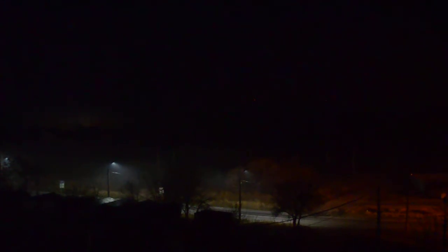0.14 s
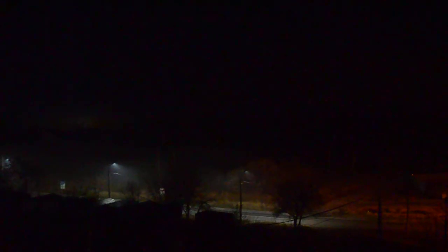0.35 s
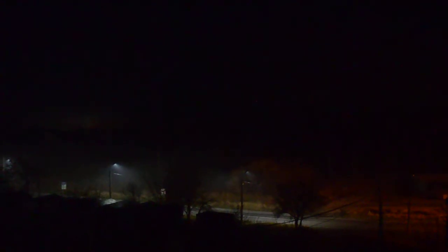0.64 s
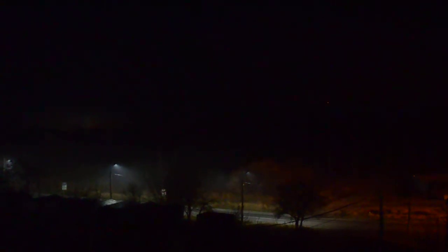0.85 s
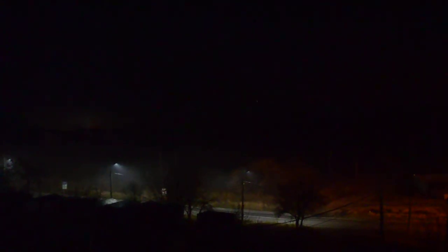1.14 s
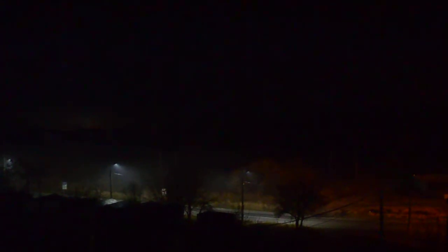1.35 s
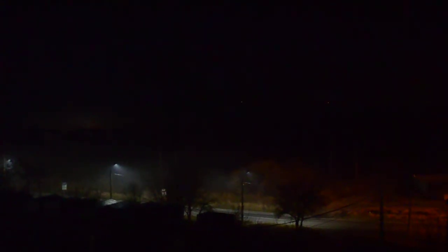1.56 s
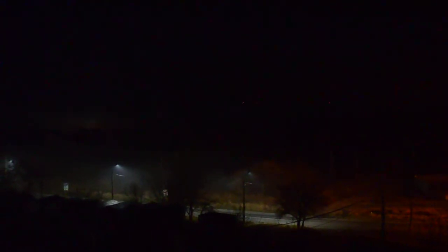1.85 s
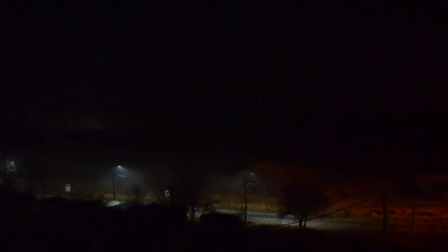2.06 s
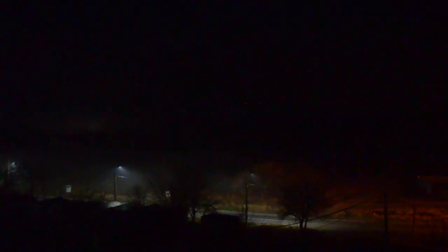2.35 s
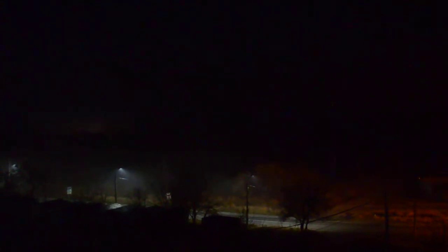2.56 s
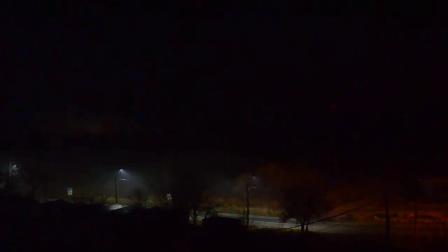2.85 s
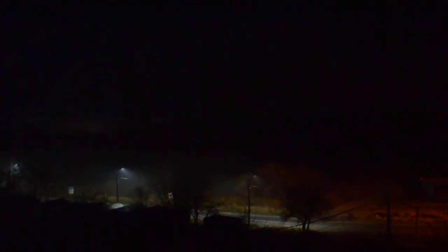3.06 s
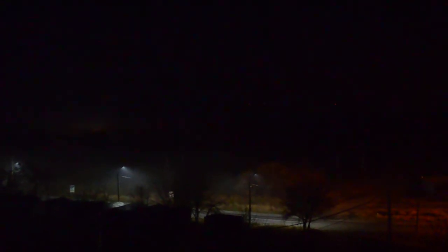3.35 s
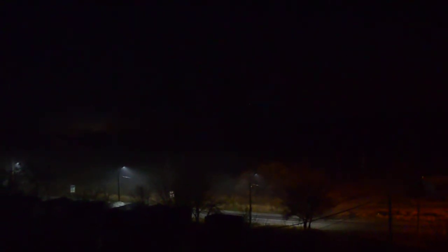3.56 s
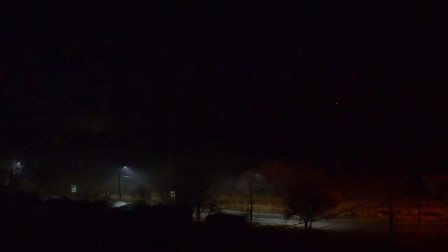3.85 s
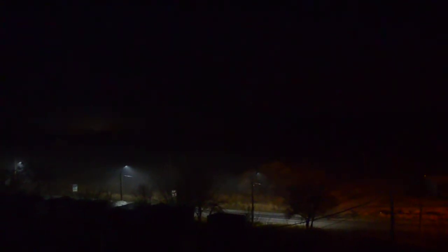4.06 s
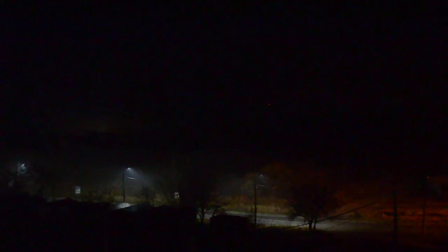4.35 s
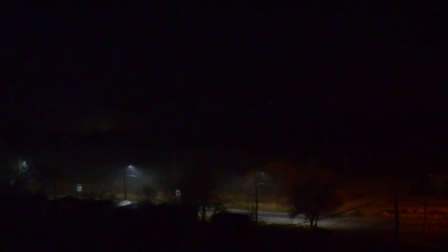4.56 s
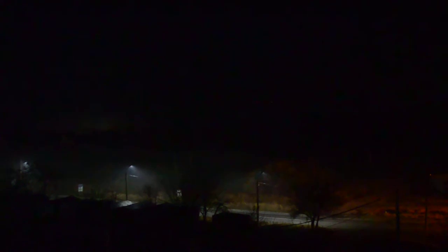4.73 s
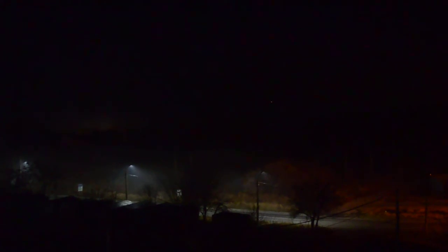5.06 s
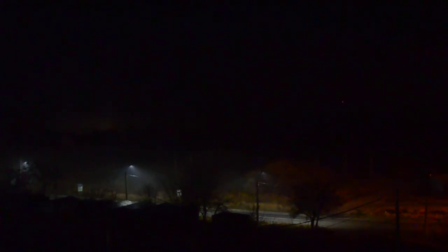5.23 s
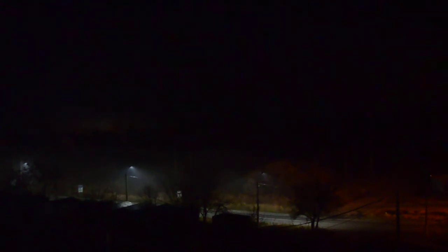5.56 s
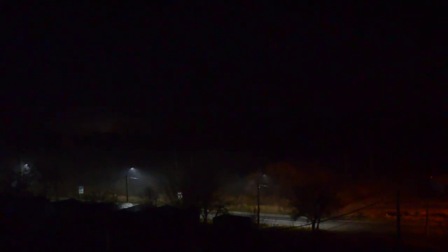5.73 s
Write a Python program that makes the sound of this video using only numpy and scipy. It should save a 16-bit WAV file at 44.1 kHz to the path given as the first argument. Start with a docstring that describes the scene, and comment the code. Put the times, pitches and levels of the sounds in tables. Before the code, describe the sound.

Two pairs of loud, overloading gun blasts crack and boom across a dark town, with rolling echoes sinking into low rumble.

```python
"""Hard gun reports crack and boom across a quiet town at night, heard from a balcony.
About .7 s after each report a second boom comes from farther off. Every blast is a pressure pulse repeated
by nearby walls, then noise shaped into a flurry, street scatter, slaps off far facades and a long roll.
A steady rumble, faint hiss, a soft thud and dull swells of very distant guns are shaped noise too.
Peaks above full scale overload the microphone and clip hard."""
import sys
import numpy as np
from scipy import signal
from scipy.fft import rfft, irfft, next_fast_len
from scipy.io import wavfile
from scipy.ndimage import uniform_filter1d

SR = 44100
rng = np.random.default_rng(int(sys.argv[2]) if len(sys.argv) > 2 else 0)


def dump_mix(stems):
    """Bounce the given channels to the path in sys.argv[1] as a 16-bit WAV at rate SR."""
    frames = np.atleast_2d(stems).T  # one column per channel
    limited = np.clip(frames, -1, 1)  # hard clip at full scale
    pcm = np.round(limited * 32767).astype(np.int16)
    wavfile.write(sys.argv[1], SR, pcm)


N = 260011
TIME = np.arange(N) / SR
GRID_HZ = np.geomspace(10, SR / 2, 900)

FIRST_S, SECOND_S = .6817, 3.0821  # times of the two hard reports in the table below
# hard reports, after an earlier one heard only as a roll under way: (time [s], blast level [dB],
# crack tilt [dB/octave], street scatter level [dB], body frequency [Hz], body level [dB],
# long roll level [dB], roll tilt [dB/octave], bearing [-1 to 1])
REPORTS = [(-0.86, 0, 0, -12, 200, 0, -18.5, -0.1, 0),
           (FIRST_S, 2.86, 0.22, -11, 420, 1.3, -26.5, -1.42, -0.76),
           (SECOND_S, 6.1, 1.34, -12, 320, 1.2, -27, 0.55, 1)]
# booms that follow the reports: same columns
BOOMS = [(-.07, -9, 10, -12.5, 400, 4.6, -31, 0, -1), (1.3593, 1.5, 3, -16, 163.6, 2.44, -32, 0.028, -0.9),
         (3.762, 2, 1.5, -13, 430, 8.2, -30.5, 0.089, 1)]
# spectrum of the booms: (frequency [Hz], relative density [dB per Hz])
BOOM_COLOUR = [(20, -24.5), (50, -3.5), (100, -7), (200, 4), (420, -1.5), (520, -3), (660, -8), (900, -9),
               (1500, -15), (2300, -20), (3200, -34.5), (4800, -45.5), (7000, -66.5), (14000, -95)]
# spectrum of the town's rumble, also used for the far guns: (frequency [Hz], relative density [dB per Hz])
TOWN_COLOUR = [(20, -23.5), (55, -27.5), (95, -2.5), (190, -1), (290, -6), (440, -12), (620, -16),
               (1000, -24), (1800, -39), (2800, -46), (5000, -54), (8000, -57.5), (12000, -66),
               (16000, -70)]


def amp(db):
    """Decibels to gain."""
    return 10 ** (np.asarray(db) / 20)


def unit(x):
    """Scales to an rms of one."""
    return x / np.sqrt(np.mean(x ** 2) + 1e-20)


def read(points, hz):
    """Joins table points on a log-frequency axis."""
    f, value = np.transpose(points)
    return np.interp(np.log(hz + 1), np.log(f + 1), value)


def add(mix, s, sound):
    """Mixes a sound in at time s, which may lie before the start."""
    at = round(s * SR)
    sound = sound[max(-at, 0):]
    part = mix[max(at, 0):][:len(sound)]
    part += sound[:len(part)]


def heard_db(colour, hz, bright_db=0, body_hz=400, body_db=0):
    """A spectrum tilted about 500 Hz, with a broad body and the balcony's resonances added."""
    # resonances and notches of balcony and microphone port: (centre [Hz], width [Hz], level [dB])
    balcony = [(87, 9.7, 0), (120.5, 13.3, 4.5), (151.3, 20, -6), (184.4, 16.6, 8), (238.4, 7, 3.5),
               (269, 31, -5.5), (332, 16, 1.5), (427, 33.5, 7.5), (489, 12, -4), (541, 27, 4),
               (600, 13, -3), (674, 270, 1), (868, 28, 3.5), (1110, 120, -2.5), (1229, 160, 3),
               (1466, 86, -4), (1800, 77, 3.1), (5690, 270, -12.5), (7160, 73, -9)]
    ring = sum(db / (1 + (2 * (GRID_HZ - f) / width) ** 2) for f, width, db in balcony)
    tilt = bright_db * np.log2(np.maximum(GRID_HZ, 250) / 500)  # flat below 250 Hz
    body = body_db * np.exp(-(2 * np.log2(GRID_HZ / body_hz)) ** 2)
    return np.interp(hz, GRID_HZ, read(colour, GRID_HZ) + tilt + body + ring)


def pulse(colour, edge_hz, shade=(), size=8192):
    """One causal pressure pulse of peak one, dulled above edge_hz by its path."""
    hz = abs(np.fft.fftfreq(size, 1 / SR))
    gain = amp(heard_db(colour, hz, *shade)) / (1 + (hz / edge_hz) ** 2)
    # minimum phase: the energy comes as early as this spectrum allows
    spectrum = np.exp(np.conj(signal.hilbert(np.log(gain + 1e-6))))
    wave = np.fft.ifft(spectrum).real[:size // 2]
    return wave / abs(wave).max()


def drift(size, smooth_s):
    """Smooth random wandering with an rms of one."""
    span = max(int(smooth_s * SR), 2)
    smooth = uniform_filter1d(rng.standard_normal(size), span, mode="wrap")
    return unit(uniform_filter1d(smooth, span, mode="wrap"))


def echoes(size, colour, shade=(), clump_db=0, clump_s=.004):
    """Countless overlapping arrivals: noise in clumps, given a spectrum and an rms of one."""
    arrivals = rng.standard_normal(size) * amp(clump_db * drift(size, clump_s))
    fast = next_fast_len(size)
    hz = np.fft.rfftfreq(fast, 1 / SR)
    coloured = rfft(arrivals, fast) * amp(heard_db(colour, hz, *shade))
    return unit(irfft(coloured, fast)[:size])


def town():
    """The steady rumble of the night: low-coloured noise at a constant level."""
    return amp(-36.5) * echoes(N, TOWN_COLOUR, clump_db=-0.8, clump_s=0.025)


def roll(build_s=0.037):
    """All reports and booms feed one long echo over the town; the air takes its treble first."""
    # spectrum of the roll: (frequency [Hz], relative density [dB per Hz])
    roll_colour = [(20, -6), (55, -6.5), (110, -1), (220, -0.5), (400, -2), (620, -9.5), (1000, -10),
                   (1500, -16), (2100, -19.5), (3000, -28), (4500, -42), (7000, -49), (14000, -77)]
    # decay of the roll: (frequency [Hz], time to fall 60 dB [s])
    roll_t60 = [(40, 4.4), (150, 6.4), (450, 6), (1000, 5.47), (2000, 4.29), (3500, 2.6), (7000, 3.3)]
    wash = echoes(N, roll_colour, clump_db=1.4, clump_s=.005)
    hz, t, bands = signal.stft(wash, SR, nperseg=1024)
    t60 = read(roll_t60, hz)[:, None]
    octaves = np.log2(np.clip(hz, 150, 3000) / 500)[:, None]
    power = 0
    for s, *_, roll_db, tilt_db, _ in REPORTS + BOOMS:
        age = np.maximum(t - s, 0)
        decay = amp(roll_db + tilt_db * octaves - 60 * age / t60)
        build = 1 - np.exp(-age / build_s)
        power = power + (decay * build) ** 2
    return signal.istft(bands * np.sqrt(power), SR, nperseg=1024)[1][:N]


def shots(rows, paths, colour, onset_s, length_s, hold, dull_db, flurry_s, swing_s, flurry_db):
    """Each blast arrives by a few wall paths, then as a bright close flurry and duller street scatter."""
    out, t = np.zeros(N), TIME[:SR // 2]
    for s, blast_db, crack_db, scatter_db, body_hz, body_db, *_, bearing in rows:
        for delay, db, edge_hz in paths:
            blast = -amp(blast_db + db) * pulse(colour, edge_hz, (crack_db, body_hz, body_db))
            add(out, s + delay, blast)
        age = t / (flurry_s + swing_s * bearing)  # 1 at the flurry's peak
        flurry = amp(blast_db + flurry_db) * (age * np.exp(1 - age)) ** 8
        add(out, s, flurry * echoes(len(t), colour, (crack_db / 2 + 1.17,), clump_db=6, clump_s=0.003))
        # the scatter builds up, holds while nearby blocks answer, then drops away
        build = 1 - np.exp(-(t / onset_s) ** 2)
        scatter = amp(scatter_db - 20 * (t / length_s) ** hold) * build
        shade = (dull_db, body_hz, body_db)
        add(out, s, scatter * echoes(len(t), colour, shade, clump_db=1.0, clump_s=.003))
    return out


def booms():
    """The farther shots, reaching the balcony past walls on another side."""
    # paths past nearby walls: (delay [s], level [dB], treble edge [Hz])
    boom_paths = [(0, -3, 4800), (.002, -2, 2800), (.0098, -6.5, 1650), (0.013, -19, 1200),
                  (.034, -17, 400)]
    return shots(BOOMS, boom_paths, BOOM_COLOUR, onset_s=0.014, length_s=.18, hold=2.24,
                 dull_db=-2, flurry_s=0.0098, swing_s=0, flurry_db=-13)


def slaps(rows, facades, dull_db, rise_share):
    """Each far facade returns a soft crack and short smear; the gun's bearing shifts the delay."""
    # spectrum of a slap: (frequency [Hz], relative density [dB per Hz])
    slap_colour = [(60, -27), (400, 2.5), (1200, 4), (2200, -1), (3500, -15), (5200, -28.5), (8000, -56),
                   (14000, -84)]
    out, t = np.zeros(N), TIME[:SR // 4]
    crack = pulse(slap_colour, 4000)
    for s, blast_db, *_, bearing in rows:
        for delay, swing, crack_db, smear_db, t60 in facades:
            arrival = s + delay + swing * bearing
            add(out, arrival, amp(blast_db + crack_db) * crack)
            build = 1 - np.exp(-(t / (rise_share * t60)) ** 2)
            smear = amp(blast_db + smear_db - 60 * t / t60) * build
            add(out, arrival, smear * echoes(len(t), slap_colour, (dull_db,), clump_db=6.0, clump_s=.003))
    return out


def boom_slaps():
    """The same far facades reflect every boom."""
    # facades: (delay [s], extra delay per unit of bearing [s], crack re blast [dB],
    # smear re blast [dB], smear time to fall 60 dB [s])
    boom_facades = [(.064, .005, -33, -25.5, 0.2), (0.204, -.0055, -21.5, -28.5, 0.066),
                    (.221, -0.02, -34, -32, 0.099), (.387, -.001, -37, -38, 0.083),
                    (0.4, .0045, -27, -38, 0.065), (.564, .002, -38, -50, 0.11), (.93, .002, -40, -47, .15)]
    return slaps(BOOMS, boom_facades, dull_db=-3.0, rise_share=0.027)


def reports():
    """The hard shots, each a blast repeated by nearby walls and scattered by the streets."""
    # paths past nearby walls: (delay [s], level [dB], treble edge [Hz])
    report_paths = [(0, 0, 1070), (.0096, -3.5, 940), (0.012, 2.5, 1540), (.018, 0.5, 2550),
                    (0.0227, -6, 3400), (.0285, -9, 2843), (0.051, -7, 1800)]
    # spectrum of the reports: (frequency [Hz], relative density [dB per Hz])
    report_colour = [(20, -11.5), (55, -10.5), (100, 1), (220, -1.5), (430, -3.5), (620, -8.5), (900, -7),
                     (1500, -15), (2100, -20.5), (3000, -33), (4500, -43.5), (7000, -60.5), (14000, -83)]
    return shots(REPORTS, report_paths, report_colour, onset_s=0.016, length_s=0.14, hold=2.94,
                 dull_db=-2.2, flurry_s=0.025, swing_s=-0.00015, flurry_db=-13.5)


def humps(rows, start=0):
    """A gain curve made of bell-shaped swells."""
    return sum(amp(db) * np.exp(-.5 * ((TIME - start - s) / half) ** 2) for s, db, half in rows)


def hiss():
    """Faint grainy noise swells behind the last two reports, more so after the brighter one."""
    # swells: (time after the report [s], level behind the last report [dB], half length [s])
    hiss_swells = [(.17, -59.5, 0.039), (.32, -52, 0.0074), (.44, -56.5, 0.11)]
    # spectrum of the hiss: (frequency [Hz], relative density [dB per Hz])
    hiss_colour = [(1000, -23), (2800, -1), (5000, -7.5), (7300, -9.5), (9000, -24), (12000, -44),
                   (16000, -47)]
    last_crack_db = REPORTS[-1][2]
    gain = 0
    for s, _, crack_db, *_ in REPORTS[1:]:
        gain = gain + humps(hiss_swells, s) * amp(3.3 * (crack_db - last_crack_db))
    grains = amp(.8 * drift(N, 0.011))
    return gain * grains * echoes(N, hiss_colour, clump_db=2.5, clump_s=0.0018)


def report_slaps():
    """The same far facades reflect every hard report."""
    # facades: (delay [s], extra delay per unit of bearing [s], crack re blast [dB],
    # smear re blast [dB], smear time to fall 60 dB [s])
    report_facades = [(.262, -0.011, -41, -42, 0.17), (.315, 0.0067, -32, -48.5, 0.18)]
    return slaps(REPORTS, report_facades, dull_db=3.5, rise_share=0.026)


def thud():
    """A short, soft swell of boom-coloured noise that runs into one of the booms."""
    # swell: (time [s], level [dB], half length [s])
    thud_swell = [(1.358, -21, 0.015)]
    return humps(thud_swell) * echoes(N, BOOM_COLOUR, (-1.5, 200, 3), clump_db=-2.5, clump_s=.003)


def far_guns(rise_s=0.21):
    """Guns so far off that each is only dull noise that swells, then sinks more slowly."""
    # very distant shots: (time [s], peak level [dB])
    far_shots = [(1.879, -32), (2.58, -39.5), (4.25, -53.5), (5.5, -40.5)]
    gain = 0
    for s, db in far_shots:
        age = np.maximum(TIME - s, 0) / rise_s
        gain = gain + amp(db) * age * np.exp(1 - age)
    return gain * echoes(N, TOWN_COLOUR, (-1.5,), clump_db=2.0, clump_s=0.022)


def scene():
    """Reports, booms and their echoes over the town, in one channel."""
    background = town() + roll() + far_guns()
    blasts = booms() + reports() + thud()
    trails = boom_slaps() + report_slaps() + hiss()
    return (background + blasts + trails)[None]


def record(dry):
    """The microphone overloads: hard clipping at full scale, then a low-pass at the band limit."""
    clipped = np.clip(dry, -1, 1)
    band_limit = signal.firwin(511, 16200, window=("kaiser", 9), fs=SR)  # edge in Hz
    return signal.oaconvolve(clipped, band_limit[None], "same")


dry = scene()
out = record(dry)
dump_mix(out)
```